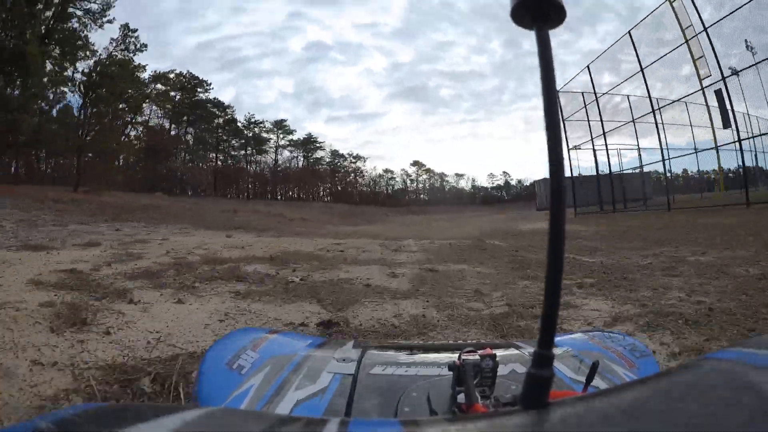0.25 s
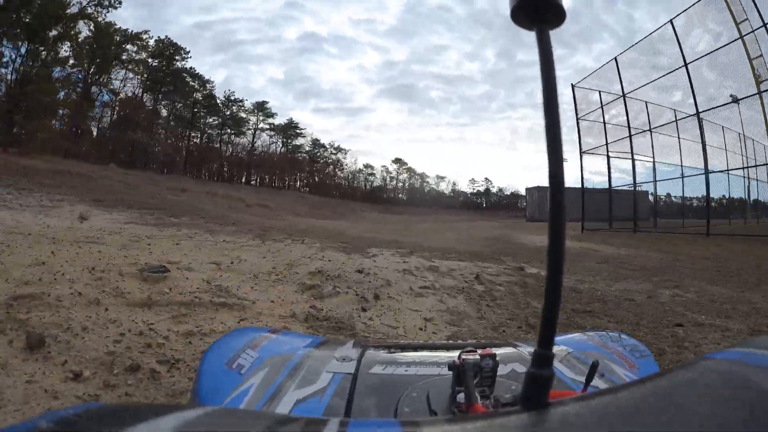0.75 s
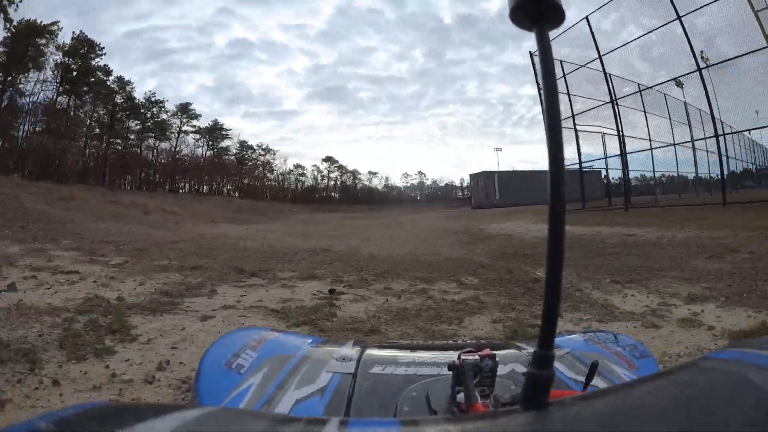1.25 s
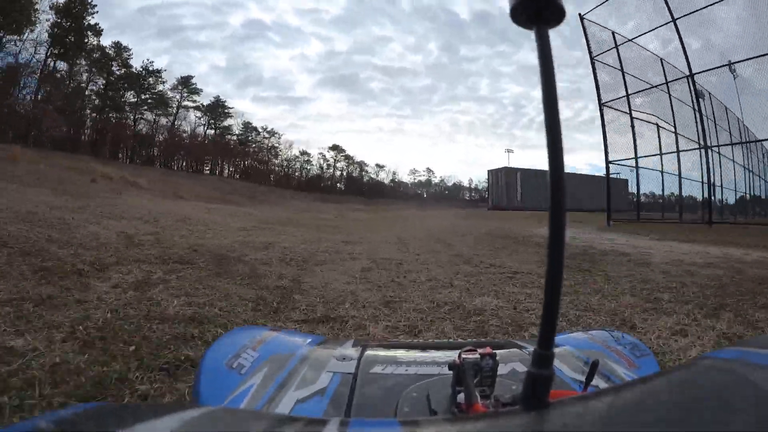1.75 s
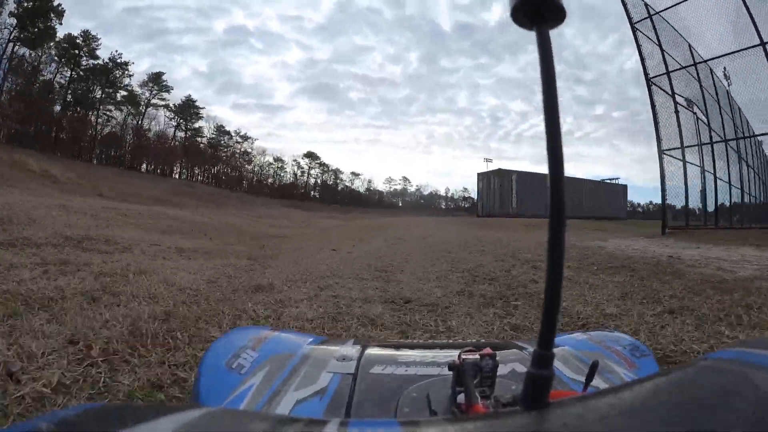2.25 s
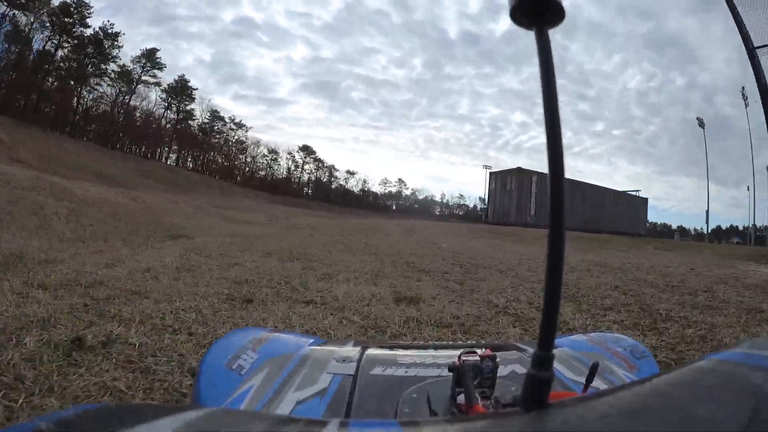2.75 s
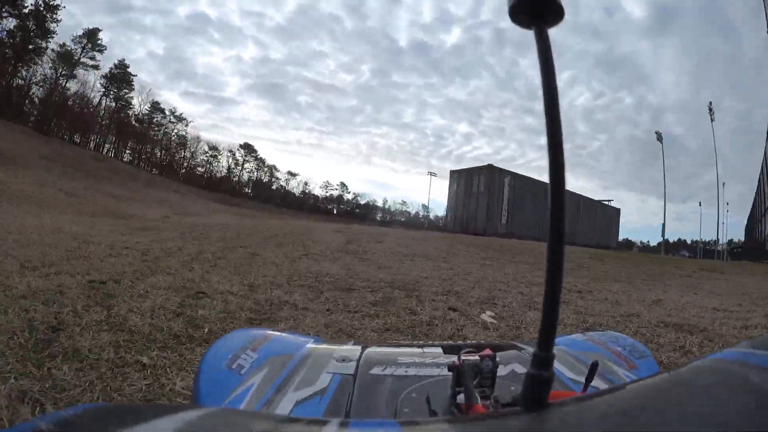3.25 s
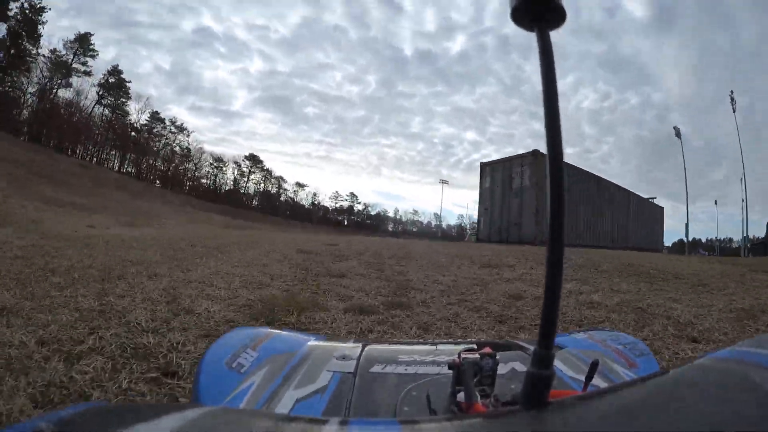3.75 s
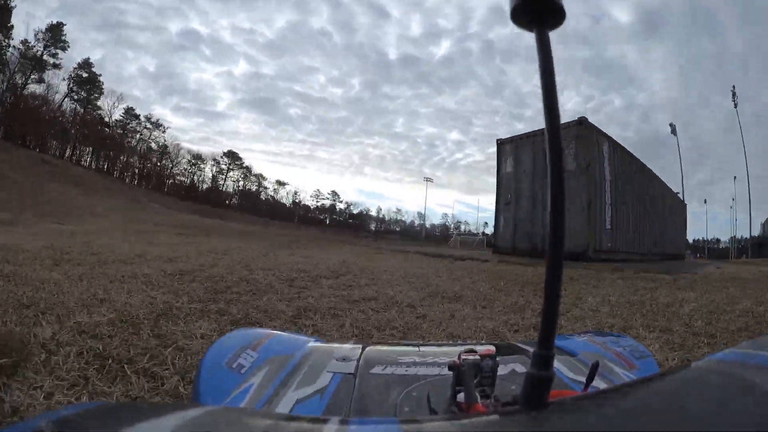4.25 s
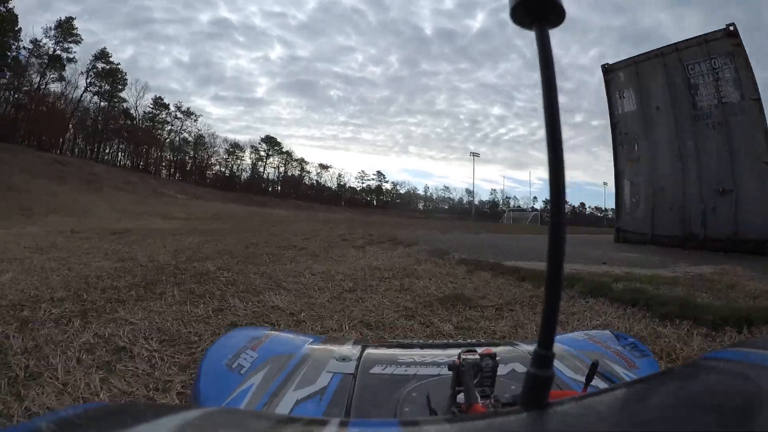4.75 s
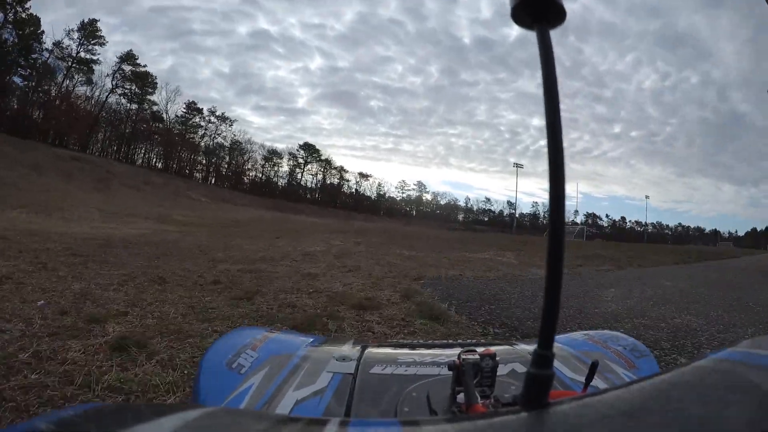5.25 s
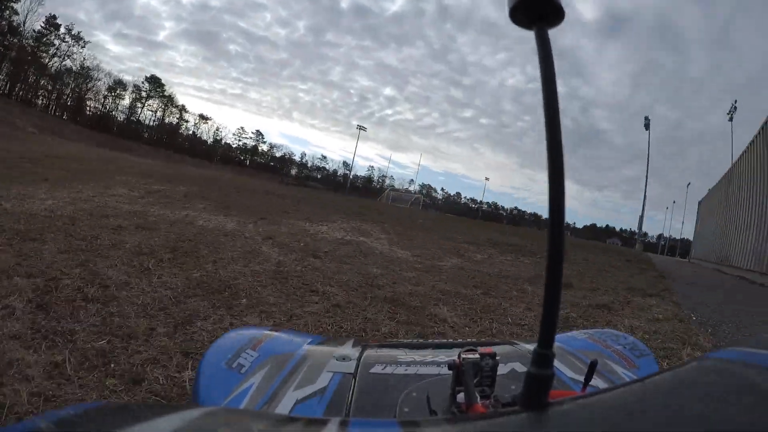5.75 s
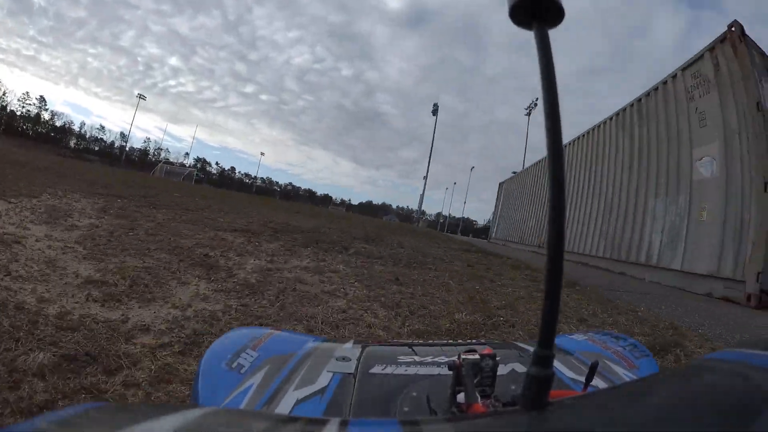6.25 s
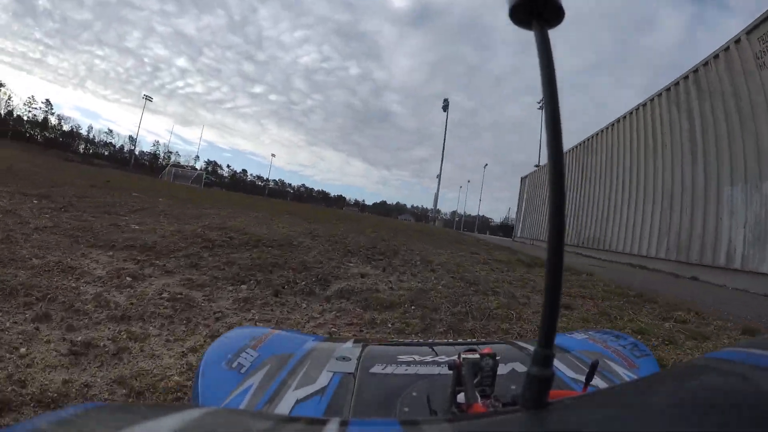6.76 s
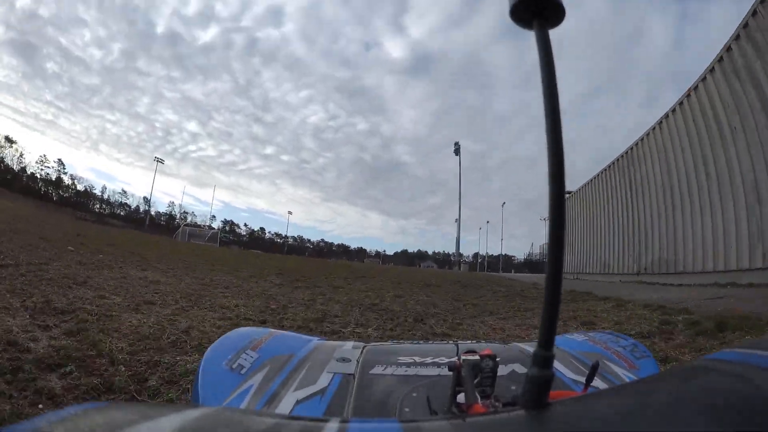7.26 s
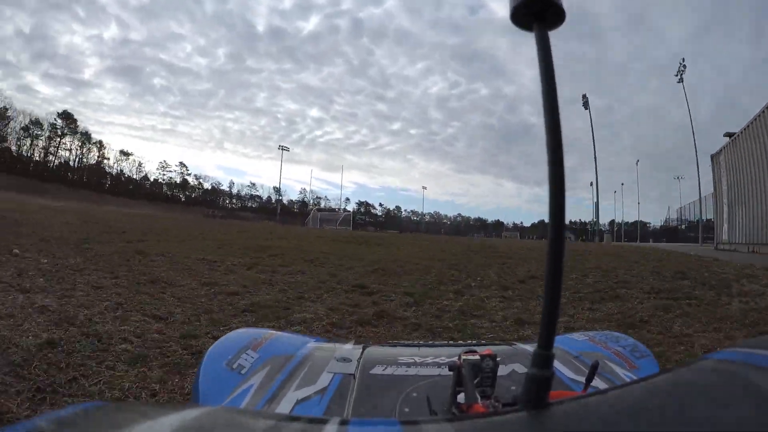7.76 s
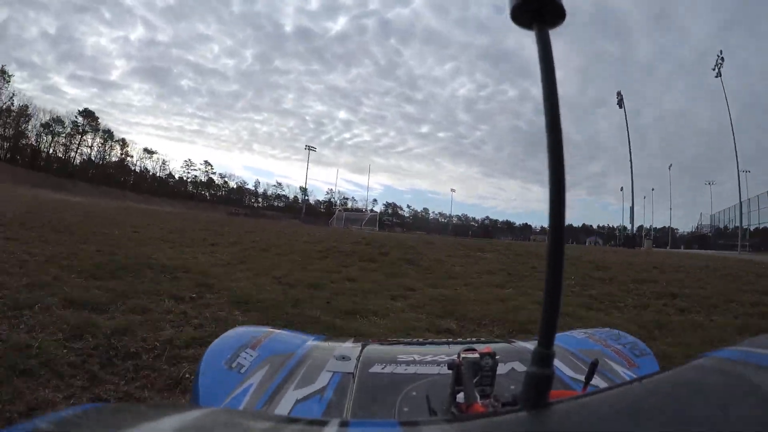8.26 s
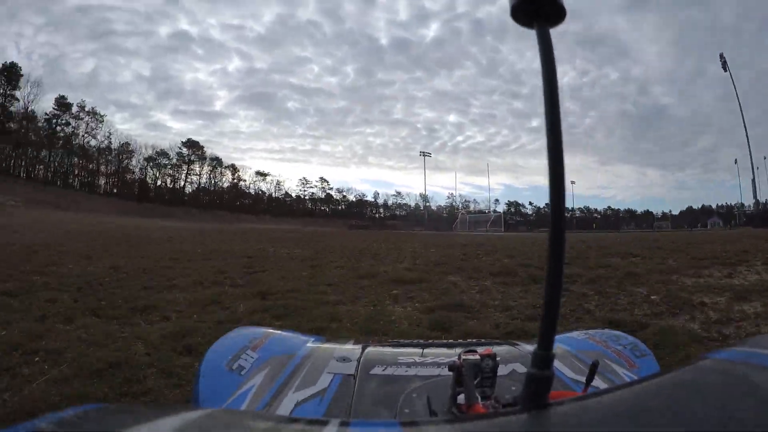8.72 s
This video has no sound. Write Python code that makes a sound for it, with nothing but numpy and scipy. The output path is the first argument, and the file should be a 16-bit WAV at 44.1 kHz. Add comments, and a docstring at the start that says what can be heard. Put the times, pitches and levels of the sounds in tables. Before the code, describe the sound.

A small radio-controlled truck rattles over dirt and grass, plastic shell droning, electric gears whining, suspension knocking, with a steady dry hiss.

```python
"""On dirt and grass, a small radio-controlled truck drives along, heard through a camera bolted to its body.
Random bumps shake the springs, shell and chassis, which rumble, drone and clatter; filtered noise is grass hiss.
The running gear hums low, and the motor and gears whine as tones that wheel slip smears into a rasp.
Short decaying rings are suspension knocks; bright ticks are stones, and very high chirps are rubbing parts.
The camera's tone has a deep hole in the treble; its fast limiter ducks loud moments and soft clipping follows."""
import sys
import numpy as np
from scipy import signal
from scipy.fft import rfft, irfft, next_fast_len
from scipy.io import wavfile
from scipy.ndimage import uniform_filter1d, minimum_filter1d, map_coordinates

SR = 44100
rng = np.random.default_rng(int(sys.argv[2]) if len(sys.argv) > 2 else 0)


def file_out(sig):
    """Save sig as 16-bit WAV at sys.argv[1]."""
    # one column per channel
    cols = np.atleast_2d(sig).T
    # limit, then scale
    lim = np.clip(cols, -1, 1)
    pcm = np.round(lim * 32767).astype(np.int16)
    wavfile.write(sys.argv[1], SR, pcm)


N = 396459  # length in samples

# How hard the ground shakes the truck: time_s [s], relative_level_db [dB]
RIDE_ROUGHNESS = [(0, 0), (.8, -1.5), (1.0, 3), (1.2, 1.5), (1.5, 2.5), (1.85, 1.5), (3.25, -1.5),
                  (3.6, 2.5), (3.8, -1.5), (4.0, 1.5), (4.16, 3.5), (4.19, -3), (4.27, 1.5), (4.77, -2),
                  (4.85, -0.5), (5.25, -0.5), (5.45, 2), (5.53, 2), (5.57, 3.5), (5.65, -2), (5.69, 3),
                  (6.7, -3.5), (7.25, 1.5), (8.0, -1), (9, -2)]


def amp(db):
    """Turn decibels into a gain."""
    return 10 ** (np.asarray(db) / 20)


def unit(x):
    """Scale a sound to rms 1."""
    return x / np.sqrt(np.mean(x ** 2) + 1e-20)


def along(points, hz):
    """Read a value at each frequency from (Hz, value) points joined on a log axis."""
    f, v = np.transpose(points)
    return np.interp(np.log(hz + 1), np.log(f + 1), v)


def curves(rows):
    """Give one value per sample for each table column after the time."""
    s, *cols = np.transpose(rows)
    return [np.interp(np.arange(N) / SR, s, c) for c in cols]


def wobble(rate):
    """Draw a smooth random curve through rate random points a second."""
    knots = rng.standard_normal(int(N * rate / SR) + 4)
    coarse = np.arange(0, N + 16, 16)  # every 16th sample, joined by straight lines
    return np.interp(np.arange(N), coarse, map_coordinates(knots, [coarse * rate / SR]))


def flutter(rate):
    """Make a random complex gain of rms 1 that smears a tone over about rate Hz."""
    return (unit(wobble(rate)) + 1j * unit(wobble(rate))) / np.sqrt(2)


def filtered(x, response):
    """Filter x by a response given as a function of frequency."""
    m = next_fast_len(N + SR // 4, True)
    return irfft(rfft(x, m) * response(np.fft.rfftfreq(m, 1 / SR)), m)[..., :N]


def ports(left_db, right_db, lead):
    """Complex gains of the two microphones, shape (2, 1); lead is the right one's phase in radians."""
    return np.array([[amp(left_db)], [amp(right_db) * np.exp(1j * lead)]])


def add(track, s, sound):
    """Mix a short stereo sound in at time s."""
    room = track[:, max(0, round(s * SR)):][:, :sound.shape[1]]
    room += sound[:, :room.shape[1]]


def grit(rate, spread_db):
    """Tiny impacts of scattered size, about rate a second, scaled to rms 1."""
    hit = rng.random(N) < rate / SR
    return unit(hit * rng.standard_normal(N) * amp(spread_db * rng.standard_normal(N)))


def shaken(modes, force, rate, spread_db):
    """Each resonance is struck by its own impacts and reaches the two microphones differently."""
    port_lag_s = 0.00042  # vibration reaches the right microphone this much later
    m = next_fast_len(N + SR // 4, True)
    f = np.fft.rfftfreq(m, 1 / SR)
    total = 0
    for hz, width, left_db, right_db, lead in modes:
        resonance = (1j * f * width / (hz * hz - f * f + 1j * f * width)) ** 2
        impacts = rfft(force * grit(rate, spread_db), m)
        # the added phase makes up for the lag at the resonance itself, so the listed lead holds there
        gains = ports(left_db, right_db, lead + 2 * np.pi * hz * port_lag_s)
        total = total + impacts * resonance * gains
    lag = np.exp(-2j * np.pi * f * port_lag_s)
    return unit(irfft(np.array([total[0], total[1] * lag]), m)[:, :N])


def rolling():
    """Bumps in the ground drive the springs' rumble, the shell's drone, the chassis clatter and grass hiss."""
    # Resonances of springs, plastic shell and chassis:
    # pitch_hz [Hz], width_hz [Hz], left_db [dB, relative], right_db [dB, relative], right_lead [radians]
    spring_modes = [(58.6, 32, 1, -7.5, .4)]
    shell_modes = [(128, 59, -29, -40.5, 0.81), (216.6, 95, -16.5, -34.5, 1.83),
                   (283.7, 124, -15, -25.5, 1.67), (467.4, 139, -1.5, -11.5, 1.5),
                   (551.5, 165, -4.5, -15, 1.22), (675, 130, -11, -13.5, 2.2)]
    chassis_modes = [(878, 200, -4.5, -6.5, 1.44), (1040, 285, -6.5, -6.5, 1), (1268, 147, -12.5, -12.5, 1),
                     (1418, 130, -18.5, -11, 1.5), (1662, 416, -10.5, -4.5, 3.5),
                     (1936, 220, 0.5, -1, 1.82), (2035, 218, -15.5, 0, 1.16), (2506, 340, -25, -3.5, -0.5),
                     (3017, 800, -22.5, -11, -2.5), (3437, 920, -19, -11.5, 2.5),
                     (4200, 1330, -40.5, -18, -1), (5210, 850, -31.5, -24, 2.24)]
    # Colour of the grass hiss: pitch_hz [Hz], relative_level_db [dB]
    grass_colour = [(3000, -33), (8000, -18.5), (9300, -4), (11000, -1), (13000, 1.5), (15500, 1)]
    # Level of the hiss, softer on the greener turf: time_s [s], relative_level_db [dB]
    turf_levels = [(0, 0), (5.2, 1), (5.6, 1), (5.9, -4.5), (7.2, -0.5), (7.6, -2.5), (9, -2.5)]
    # How hard the whole truck heaves on its springs: time_s [s], relative_level_db [dB]
    heave_levels = [(0, 1.5), (.12, 2), (.4, -5), (.85, -3), (1.15, 3.5), (1.55, 6), (1.9, -5.5),
                    (2.25, -1), (2.55, 0), (2.9, -2), (3.3, -6.5), (3.5, -1.5), (3.63, 5.5), (3.8, -2),
                    (4.3, 1), (4.55, -2.5), (4.75, 1), (5.3, -1.5), (5.67, 10), (6.1, 4), (6.35, -6.5),
                    (6.75, -8.5), (7.0, -5), (7.2, 0.5), (7.42, -1.5), (7.62, 6), (7.88, -5), (8.15, -1),
                    (8.4, 1), (8.62, 4.5), (8.85, -3.5), (9, 3)]
    # base levels in dB, before the moving curves
    heave_base_db, drone_db, clatter_db, hiss_db = -51, -21.5, -18, -35.5
    drone_follows_heave = 0.15  # share of the heave's dB swings that the drone takes

    ride_db, = curves(RIDE_ROUGHNESS)
    turf_db, = curves(turf_levels)
    heave_db, = curves(heave_levels)
    bumps = wobble(70)

    rumble = shaken(spring_modes, 1, rate=4000, spread_db=0.5) * amp(heave_base_db + heave_db)
    drone = shaken(shell_modes, amp(2.0 * bumps), rate=4000, spread_db=1.0)
    drone = drone * amp(drone_follows_heave * heave_db)
    clatter_force = amp(1.45 * bumps + 0.74 * wobble(330))
    clatter = shaken(chassis_modes, clatter_force, rate=2000, spread_db=2.0)

    blades = np.array([grit(rate=14000, spread_db=0.0) for side in range(2)])
    # the left side is quieter and picks up a little of the right
    blades = np.array([amp(-8) * (blades[0] + 0.27 * blades[1]), blades[1]])
    hiss = unit(filtered(blades, lambda hz: amp(along(grass_colour, hz))))
    hiss = hiss * amp(1.2 * bumps + 1.4 * wobble(25))

    ground = amp(drone_db) * drone + amp(clatter_db) * clatter + amp(hiss_db + turf_db) * hiss
    return rumble + amp(ride_db + 0.63 * wobble(6)) * ground


def running_gear_hum(width=55, waver=.011):
    """A low running-gear hum near 480 Hz drifts and wavers at random, part clean tone and part noise."""
    # Running-gear hum: time_s [s], level_db [dB, before microphone gains], pitch_hz [Hz, before waver],
    # roughness [0 clean to 1 noisy]
    hum_path = [(0, -31.5, 488.3, 1), (.7, -31.5, 489.2, .9), (1.15, -25, 478.6, 0.5), (1.7, -27, 484, 0.9),
                (2.3, -25.5, 502.6, 1), (2.6, -28.5, 473.4, .5), (2.95, -26, 470.8, 0),
                (3.2, -23.5, 486.6, 0.3), (3.9, -25, 497.8, 0.4), (4.2, -28, 498, .6),
                (4.55, -23, 475, 0.6), (4.72, -25.5, 496, 0.7), (5.0, -26.5, 462.5, .8),
                (5.3, -37, 479, .9), (9, -36, 488.6, .9)]
    db, hz, rough = curves(hum_path)
    rough = np.clip(rough, 0, 1)
    turn = 2 * np.pi * np.cumsum(hz * (1 + waver * wobble(14))) / SR
    voice = np.sqrt(1 - rough) + np.sqrt(rough) * flutter(width)
    hum = voice * np.exp(1j * turn)
    return (ports(6.2, -3.5, 1.02) * hum).real * amp(db)


def squeal_db():
    """Each push of the throttle swells the gear squeal, holds it and lets it go."""
    # Throttle pushes: start_s [s], length_s [s, swell and hold], level_db [dB, before microphone gains]
    throttle_pushes = [(0.211, .11, -21.5), (0.437, .09, -21), (0.605, 0.057, -22.5), (0.702, .1, -23.5),
                       (6.2, .08, -31), (6.309, .43, -23.5), (6.776, .2, -33), (6.987, 0.099, -27.5),
                       (7.13, .12, -23.5)]
    attack_s, release_s, idle_db = 0.047, 0.065, -46.5
    t = np.arange(N) / SR
    pushes = 0
    for s, length, db in throttle_pushes:
        corners = [s, s + attack_s, s + length, s + length + release_s]
        pushes = pushes + amp(db) * np.interp(t, corners, [0, 1, 1, 0])
    return 20 * np.log10(amp(idle_db) + pushes)


def motor(shaft_rough=0.73, octave_db=-7.5, overtone_db=-10, overtone_hz=5750, overtone_width_hz=300):
    """Motor shaft and gear mesh sing together; slipping wheels smear the tones into a rasp."""
    # Gear mesh, where the teeth meet: time_s [s], pitch_hz [Hz, before wobble],
    # level_db [dB, before microphone gains], wheel_slip [0 to 1]
    mesh_tone = [(0, 1240, -38, 0.53), (.26, 1274, -27, .35), (.35, 1274, -35, 0.4), (.42, 1274, -24, .35),
                 (.5, 1285, -35, 0.44), (.57, 1285, -24.5, 0.4), (.69, 1285, -35, 0.43),
                 (.8, 1292, -24.5, 0.34), (.88, 1310, -33.5, .45), (1.08, 1391, -27, .2),
                 (2.4, 1420, -30, 0.2), (2.95, 1462, -33, 0.29), (3.15, 1502, -43, 0.61),
                 (4.55, 1445, -33, .5), (4.85, 1302, -41, 0.48), (4.97, 1275, -23, .3),
                 (5.1, 1229, -32.5, .6), (6.05, 1300, -45.5, .86), (6.37, 1303, -41, 0.23),
                 (6.54, 1290, -43, .15), (6.63, 1260, -46, .15), (6.75, 1282, -47, 0.24),
                 (6.87, 1410, -43, 0.62), (6.96, 1460, -46, 0.66), (7.01, 1600, -46, .75),
                 (7.05, 1770, -45, .8), (7.1, 1990, -40.5, 0.83), (7.17, 2190, -37.5, .95),
                 (7.27, 2310, -40, 1), (7.42, 2490, -48, 0.96), (8.98, 2403, -43, 0.97)]
    # Hum of the motor shaft, louder under load: time_s [s], level_db [dB, before microphone gains]
    shaft_hum = [(0, -36), (1.1, -43), (5.2, -39.5), (5.95, -28), (6.3, -23), (6.88, -21), (7.02, -32),
                 (7.1, -32), (7.2, -23.5), (7.55, -22.5), (8.1, -27.5), (9, -27.5)]
    # Gear case resonances that skipping teeth set off:
    # pitch_hz [Hz], width_hz [Hz], left_db [dB, relative], right_db [dB, relative], right_lead [radians]
    gear_case_modes = [(3880, 420, -14.5, -1.5, 1.2), (4380, 480, -14.5, 0, -1.8)]
    slip_wobble_rate = 139.6  # random points a second: slipping wheels shake the motor's speed
    grab_s = .009  # tyres grab and slip, so a speed change comes in jerks about this early or late
    squeal_smear_hz, screech_db = 200.2, 1.5  # smear of the squeal; rasp level against the squeal

    mesh_hz, mesh_db, rough = curves(mesh_tone)
    shaft_db, = curves(shaft_hum)
    surge = np.gradient(np.log(mesh_hz)) * SR  # how fast the pitch is changing
    jerks = (0.00744 + grab_s * np.abs(surge)) * wobble(36)
    slip_shake = 0.0386 * rough ** 2 * wobble(slip_wobble_rate)
    turn = 2 * np.pi * np.cumsum(mesh_hz * (1 + jerks + slip_shake)) / SR

    def partial(multiple, db, share, smear, gains):
        """One multiple of the mesh rate, part clean tone and part narrow noise."""
        share = np.clip(share, 0, 1)
        voice = np.sqrt(1 - share) + np.sqrt(share) * flutter(smear)
        return (gains * voice * np.exp(1j * multiple * turn)).real * amp(db + 2.0 * wobble(22))

    per_mesh = .418  # shaft pitch as a share of mesh pitch
    shaft = partial(per_mesh, shaft_db, shaft_rough, 130, ports(3.1, -4.0, 0.72))
    octave = partial(2 * per_mesh, shaft_db + octave_db, shaft_rough, 130, ports(-1, 2.1, 0.7))
    mesh = partial(1, mesh_db, rough, 150, ports(-2.5, 3.6, 0.44))

    # the gears squeal an octave above the mesh; with spinning wheels the squeal gives way to a screech
    gear_db, gear_side = squeal_db(), ports(-11.0, 4.2, -1.2)
    spin = np.clip(rough, 0, 1) ** 4
    squeal = partial(2, gear_db + 5 * rough * wobble(55), rough, squeal_smear_hz, gear_side)
    screech = shaken(gear_case_modes, amp(2.3 * wobble(110)), rate=3000, spread_db=2.5)
    screech = screech * amp(gear_db + screech_db)
    # the squeal's overtone stands out only near a resonance of the chassis
    resonance = 1 / (1 + ((4 * mesh_hz - overtone_hz) / overtone_width_hz) ** 4)
    overtone = resonance * partial(4, gear_db + overtone_db, rough, squeal_smear_hz, gear_side)
    return shaft + octave + mesh + np.sqrt(1 - spin) * squeal + np.sqrt(spin) * screech + overtone


def knocks(blows, decay=0.97, crack_db=-4.5, detune=0.013, shift_per_db=0.35):
    """The suspension bottoms out: a dull crack and a chassis ring, a little different each time."""
    # Ring of a knock: pitch_hz [Hz, before detuning], relative_level_db [dB],
    # fade_s [s to fall 60 dB, before the decay factor]
    ring_tones = [(496, -21.5, 0.052), (736, -16.5, .018), (914, -10.5, 0.021), (1470, -18, .014),
                  (1978, -4.5, 0.026), (2050, -2, 0.014), (2490, -11, 0.02), (3360, -13, 0.011),
                  (4560, -29.5, .012)]
    out, t = np.zeros((2, N)), np.arange(SR // 12) / SR
    hz, db, t60 = np.transpose(ring_tones)[:, :, None]
    soft = signal.butter(3, [350, 4400], 'bandpass', fs=SR)
    for s, level in blows:
        size, pitch, phase = rng.standard_normal((3, len(ring_tones), 1))
        # blows above 0 dB shift the ring: a little lower at first; a factor below -1 sounds higher instead
        pitch_factor = 1 + detune * pitch - shift_per_db * max(level, 0)
        angle = 2 * np.pi * hz * pitch_factor * t + .5 * phase
        fade = amp(db + 1.6 * size - 60 * t / (t60 * decay))
        ring = (fade * np.exp(1j * angle)).sum(0)
        crack = signal.lfilter(*soft, rng.standard_normal((2, len(t)))) * amp(crack_db - 60 * t / 0.006)
        onset = 1 - np.exp(-t / 0.00066)
        add(out, s, amp(level + 5.5) * ((ports(-1.3, 1.0, 1.79) * ring).real + crack) * onset)
    return out


def rattles(count=300):
    """Plan light knocks at chance moments, harder on rough ground: rows (s, relative level dB)."""
    rate_per_s, base_db, spread_db = 20, -15, 1.2
    times = np.cumsum(rng.gamma(2, size=count)) / (2 * rate_per_s)
    levels = base_db + spread_db * rng.standard_normal(count)
    levels = levels + np.interp(times, *np.transpose(RIDE_ROUGHNESS))
    return [(s, db) for s, db in zip(times, levels) if s < N / SR]


def stones(t60=.013, snap_db=-25):
    """A stone flung against the chassis gives a bright, rough tick that dies in milliseconds."""
    # Stone hits: start_s [s], relative_level_db [dB], pitch_hz [Hz]
    stone_hits = [(0.262, -16.5, 3600), (4.129, -15, 3870), (4.143, -10, 4080), (4.145, -5, 3700),
                  (4.281, -15, 3390), (4.435, -17, 4420), (4.845, -18, 3750), (5.085, -18, 3710),
                  (5.535, 3, 4450), (5.712, -15, 3570), (6.109, -15, 3580), (7.218, -13.5, 3810)]
    out, t = np.zeros((2, N)), np.arange(SR // 30) / SR
    for s, db, hz in stone_hits:
        jitter = np.cumsum(rng.normal(0, 0.12, (2, len(t))), axis=1)  # roughens the tone
        tick = np.sin(2 * np.pi * hz * t + jitter) + amp(snap_db) * rng.standard_normal((2, len(t)))
        onset = 1 - np.exp(-t / 0.00044)
        add(out, s, amp(db + 5.5 - 60 * t / t60) * amp([[-5], [2]]) * tick * onset)
    return out


def squeaks(length=.006):
    """Rubbing parts of the running gear give very high, brief chirps with a smooth swell."""
    # Squeaks: time_s [s, about 6 ms before the peak], level_db [dB, before left and right gains],
    # pitch_hz [Hz]
    squeak_chirps = [(0.8131, -29, 14200), (5.708, -27, 13400), (5.843, -27, 13750), (5.909, -26, 13400),
                     (6.0462, -29.5, 14000), (6.2107, -27.5, 14100), (6.291, -34.5, 13600),
                     (8.2537, -30.5, 12250), (8.4687, -34.5, 13900)]
    out, t = np.zeros((2, N)), np.arange(SR // 25) / SR
    for s, db, hz in squeak_chirps:
        phase = 2 * np.pi * hz * t + np.cumsum(rng.normal(0, 0.35, len(t)))
        swell = np.exp(-((t - t.mean()) / length) ** 2)
        add(out, s - .014, amp(db) * amp([[-8], [2]]) * np.sin(phase) * swell)
    return out


def scene():
    """Add up all the sounds that reach the camera through the truck's body."""
    # Hard suspension knocks: start_s [s], relative_level_db [dB]
    hard_knocks = [(0.106, 0), (0.187, -3.5), (0.332, -4.5), (0.367, -7.5), (0.597, -5.5), (0.714, -10),
                   (0.754, -8.5), (1.448, -4), (1.521, 0.5), (1.582, -3.5), (2.041, -6.5), (2.073, -3),
                   (2.162, -8), (2.449, -7), (2.61, -7.5), (2.731, -7.5), (2.99, -3), (3.441, -3),
                   (3.872, -6.5), (3.896, -8.5), (4.074, -5), (4.128, -3), (4.146, 0), (4.281, -11.5),
                   (4.35, -5.5), (4.434, -3.5), (4.592, -5), (4.744, -7), (4.793, -6.5), (4.872, -8.5),
                   (4.888, -3.5), (4.974, -7.5), (5.005, -7), (5.026, -8.5), (5.042, -0.5), (5.069, -8),
                   (5.085, -1), (5.114, -10.5), (5.134, -2.5), (5.26, -5), (5.282, -7.5), (5.299, -4),
                   (5.329, -1.5), (5.358, -9), (5.392, -4), (5.423, -6.5), (5.504, -3.5), (5.535, 8.5),
                   (5.591, -9), (5.636, -2.5), (5.716, -6), (5.751, -7), (5.787, -6.5), (5.815, -9.5),
                   (5.857, -5.5), (5.888, -8), (5.935, -6), (5.989, -4), (6.007, -2.5), (6.082, -10),
                   (6.129, -5), (6.769, -6), (6.881, -7), (7.03, -7), (7.458, -4), (7.734, -7.5),
                   (7.795, -4.5), (7.887, -4), (7.997, -7), (8.264, -2.5), (8.381, -7), (8.405, -5.5),
                   (8.496, -7), (8.672, -10.5), (8.729, -7), (8.844, -8.5), (8.885, -3.5), (8.938, -9.5)]
    steady = rolling() + running_gear_hum() + motor()
    return steady + knocks(hard_knocks) + knocks(rattles()) + stones() + squeaks()


def limiter(x, ceiling_db, slope, attack, hold, release_db):
    """Turn loud moments down with a lag of about attack s, hold, then recover at release_db a second."""
    power = np.abs(uniform_filter1d(np.mean(x ** 2, 0), size=180))
    needed = min(slope, 1) * np.minimum(0, ceiling_db - 10 * np.log10(power + 1e-12))
    half = max(1, int(hold * SR / 2))
    held = minimum_filter1d(needed, 2 * half + 1, origin=half)
    ramp = release_db * np.arange(N) / SR
    gain_db = np.minimum.accumulate(held - ramp) + ramp
    # the lagging gain lets the first cycles of a knock through
    keep = np.exp(-1 / (attack * SR))
    return x * amp(signal.lfilter([1 - keep], [1, -keep], gain_db))


def peak_stop(x, top=1.15, size=90):
    """Hold the hardest peaks near full scale with a gain that looks ahead (size in samples)."""
    needed = np.minimum(1, top / (np.abs(x).max(0) + 1e-9))
    return x * uniform_filter1d(minimum_filter1d(needed, size), size)


def record(dry):
    """Pass the sound through the camera: its uneven tone, limiter, soft clipping and band limit."""
    # The camera's tone, with a deep hole at about 7 to 8.7 kHz: pitch_hz [Hz], gain_db [dB]
    camera_tone = [(5700, 0.5), (6400, -5), (7000, -17.5), (8600, -38), (8900, 0.5), (9400, 2)]
    top_hz = 15450
    heard = filtered(dry, lambda hz: amp(along(camera_tone, hz)))
    limited = limiter(heard, ceiling_db=-14.0, slope=0.98, attack=0.0031, hold=0.014, release_db=170.0)
    limited = peak_stop(limited)
    clipped = limited / (1 + limited ** 16) ** (1 / 16)  # bends only close to full scale
    return filtered(clipped, lambda hz: hz < top_hz)


dry = scene()
out = record(dry)
file_out(out)
```